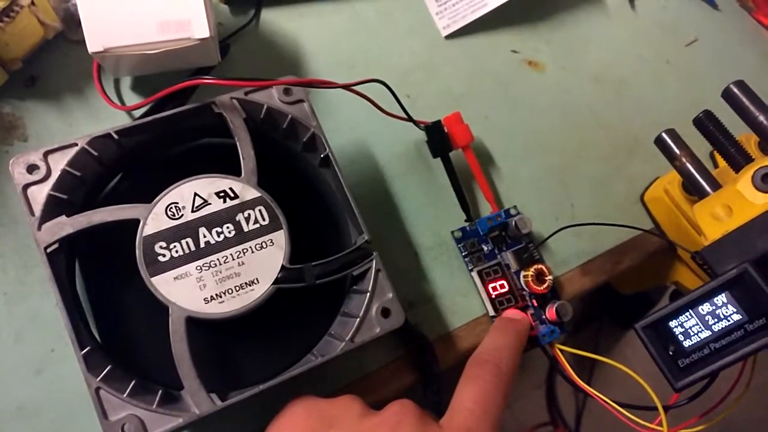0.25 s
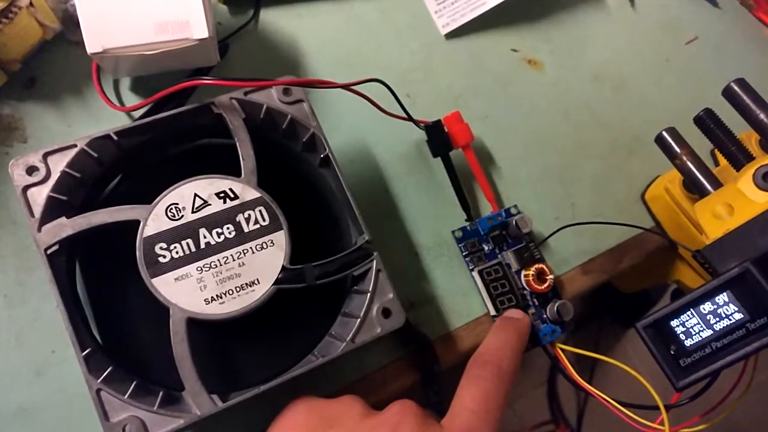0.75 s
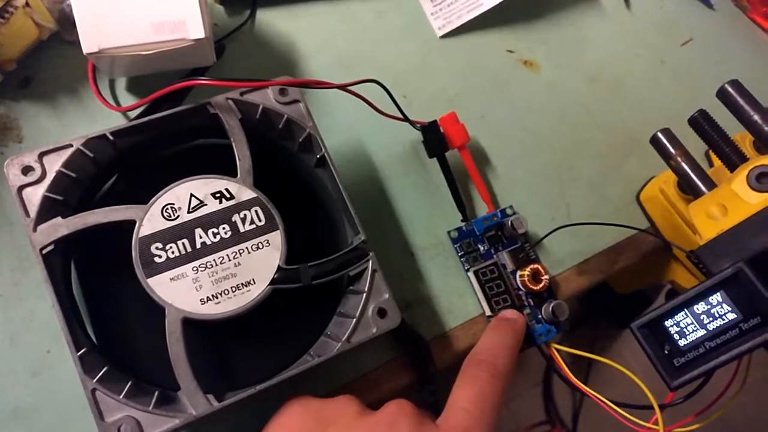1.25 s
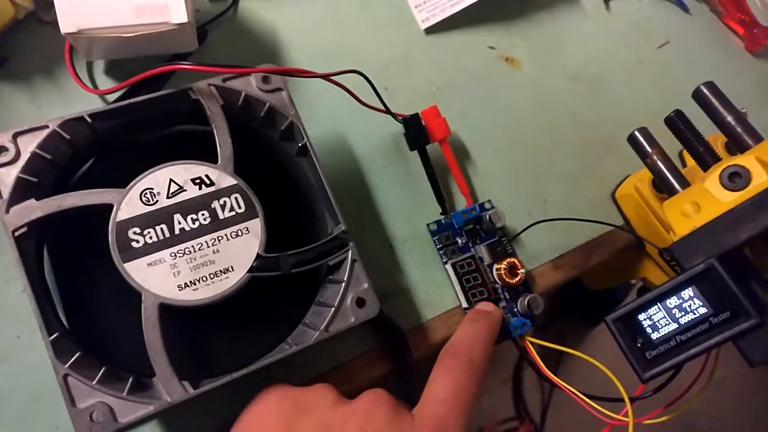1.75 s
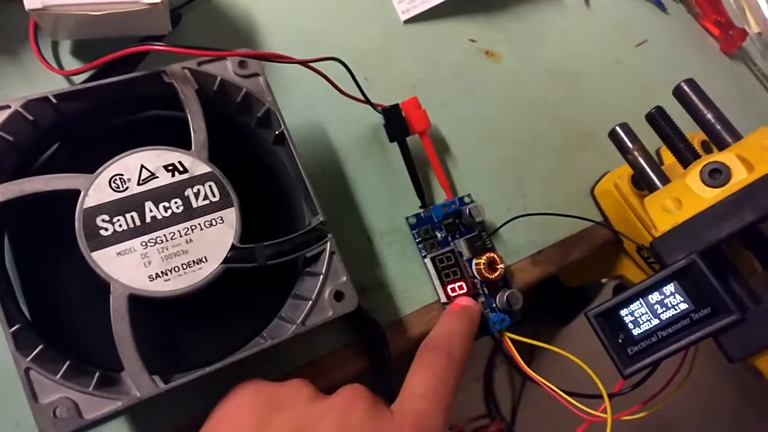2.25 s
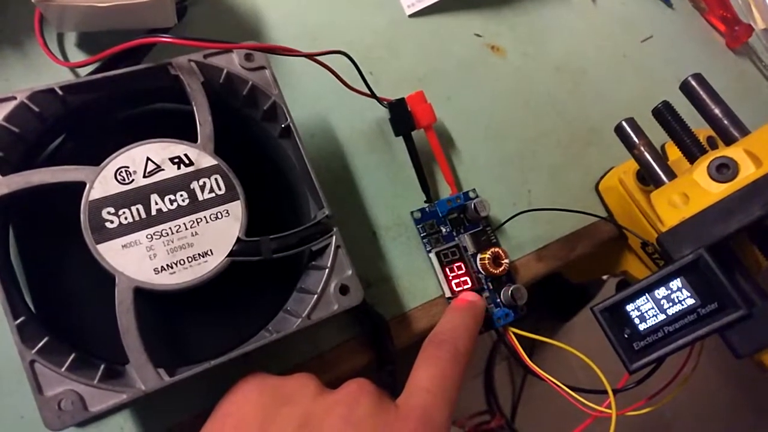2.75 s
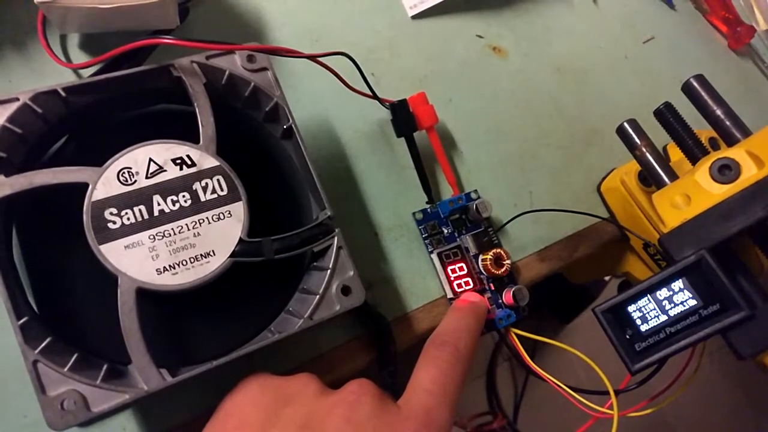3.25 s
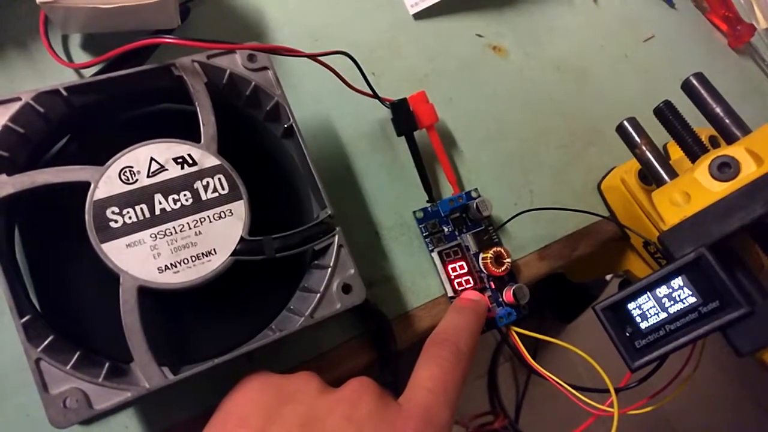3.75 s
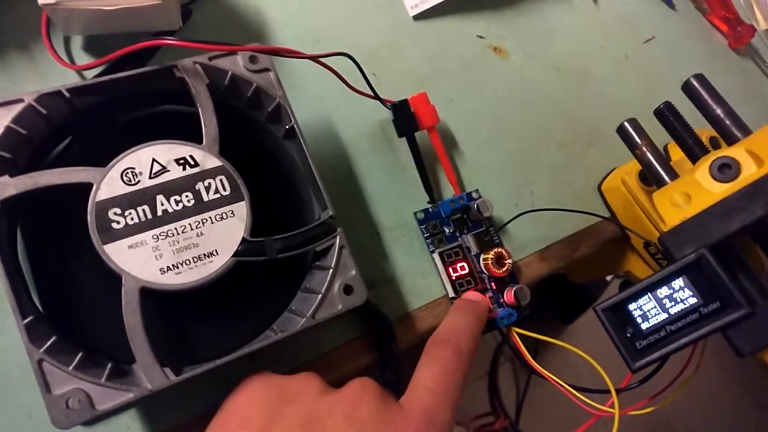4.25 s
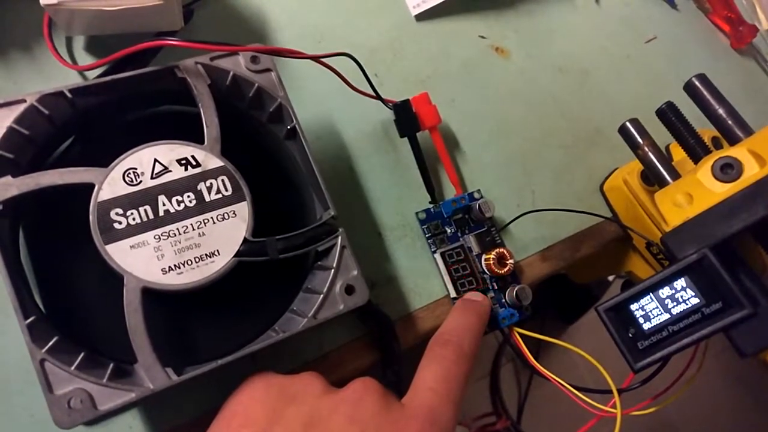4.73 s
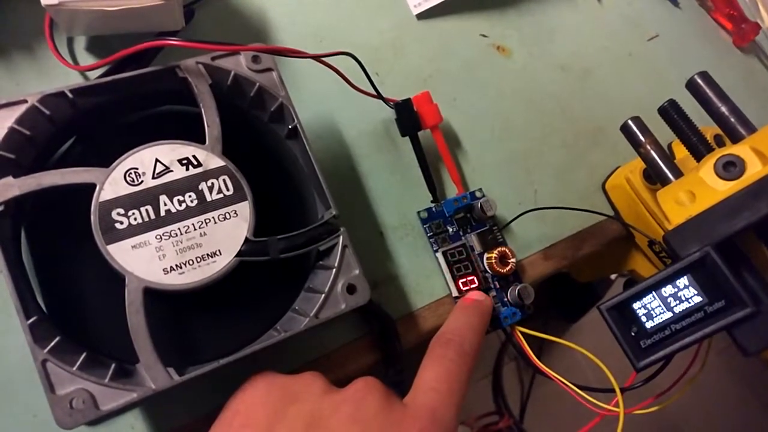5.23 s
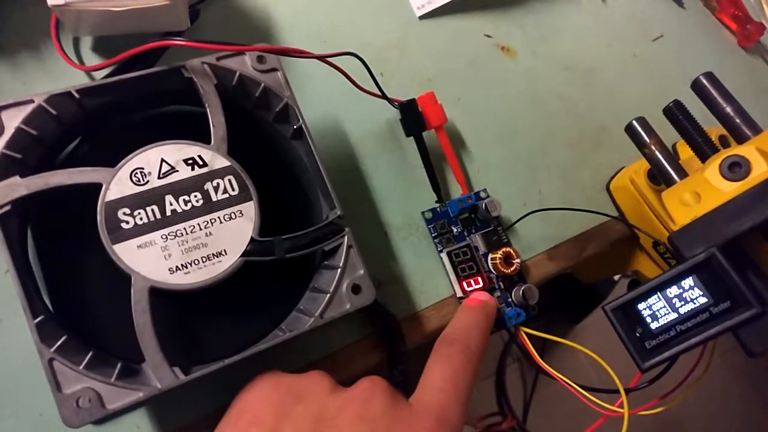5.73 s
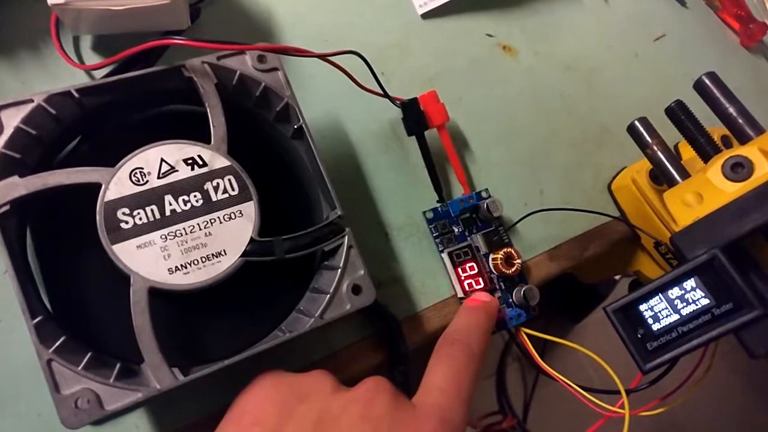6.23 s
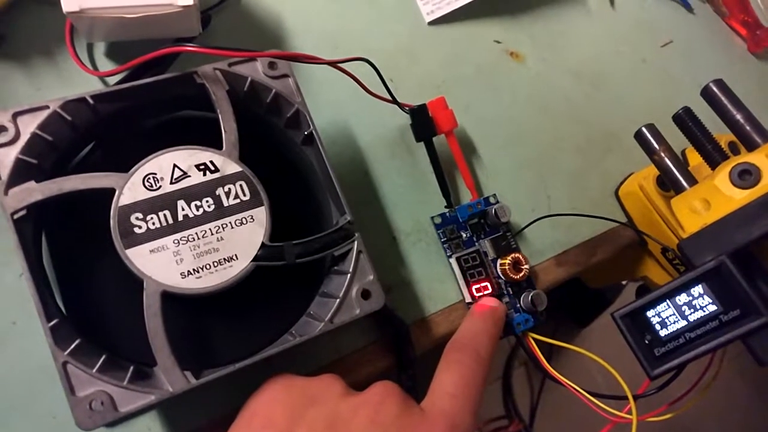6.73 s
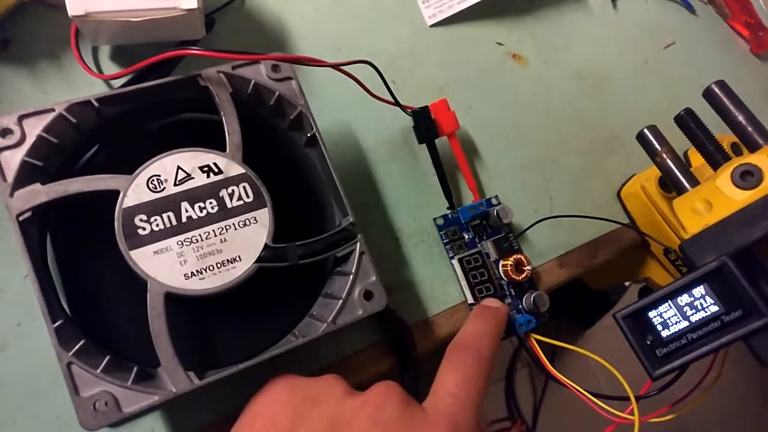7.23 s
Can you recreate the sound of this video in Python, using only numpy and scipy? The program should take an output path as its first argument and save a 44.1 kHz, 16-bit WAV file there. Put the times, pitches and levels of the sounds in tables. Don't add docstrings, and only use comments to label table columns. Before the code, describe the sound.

From 0 s a small, fast axial fan is already at full speed on a bench, about a forearm's length from a handheld stereo microphone. A steady, reedy whine sits near 718 Hz with strong second, third and fourth harmonics up to about 2.9 kHz and only faint higher ones. Around it is a wide rush of turbulent air, thickest around 1 to 5 kHz, with weak bass and a grainy, fluttering hiss. The right is brighter and fuller; the left hears little of the fundamental and has duller treble. The level dips very slightly near 1.25 s, rises a touch around 2.7 s, is marginally strongest near 5.6 s, then eases back. Pitch wavers by a hair, sinking faintly to about 715 Hz after 6.8 s. No starts, stops or clicks; it runs on until the end around 7.5 s.

```python
import sys
import numpy as np
from scipy import signal
from scipy.fft import rfft, irfft, next_fast_len
from scipy.io import wavfile
from scipy.ndimage import uniform_filter1d

SR = 44100
rng = np.random.default_rng(int(sys.argv[2]) if len(sys.argv) > 2 else 0)


def nominal_scale(level):
    x = np.asarray(level, float) / 20
    return 10 ** x


def waveform_to_disk(signal):
    frames = np.transpose(np.atleast_2d(signal))
    scaled = np.clip(frames, -1, 1) * 32767
    samples = np.round(scaled).astype(np.int16)
    wavfile.write(sys.argv[1], SR, samples)


N = 329868

# time in seconds, blade passing rate in Hz, lean of the phone toward the fan in dB.
FAN_SPEED_AND_LEAN = [(0.0, 718.0, -0.3), (1.25, 717.8, -0.7), (2.0, 719.1, -0.3), (2.7, 718.2, 0.3),
                      (4.1, 718.8, 0.0), (4.9, 718.3, 0.1), (5.6, 719.3, 0.5), (6.4, 718.8, 0.0),
                      (6.8, 717.6, -0.3), (7.15, 715.0, -0.4), (7.48, 715.0, -0.4)]
# multiple of the passing rate, left level in dB, right level in dB, left's lead in radians.
BLADE_TONES = [
    (1, -50.5, -31.1, 1.1),
    (2, -37., -33.1, -1.75),
    (3, -35.2, -33.4, .94),
    (4, -34.2, -32.5, -.49),
    (5, -51., -45., 2.95),
    (7, -58., -56., -3.),
    (8, -56., -55.5, 3.),
]
# frequency in Hz, density in dB per Hz.
RUSH_SPECTRUM_LEFT = [(22.0, -85), (62.0, -65.5), (130.0, -64.5), (552.0, -66), (2542.0, -51.5),
                      (2706.0, -55.5), (5073.0, -59.5), (7283.0, -67.5), (8778.0, -80.5), (9494.0, -81.5),
                      (11246.0, -80.2), (15650.0, -69)]
RUSH_SPECTRUM_RIGHT = [(22.0, -82), (76.0, -63.6), (166.0, -61), (413.0, -66), (449.0, -62), (811.0, -59),
                       (1285.0, -51.5), (1827.0, -50), (4724.0, -57), (6968.0, -66), (10283.0, -58),
                       (15650.0, -60)]
# centre in Hz, width in Hz, height in dB.
RESONANCES_LEFT = [(258, 69, 3.7), (396, 110, -4), (498, 55, 4), (654, 32, -0.5), (820, 147, 0.7),
                   (1050, 100, 2.5), (1276, 41, 8), (1430, 200, -4), (2080, 386, 1.9), (2400, 198, -2),
                   (4100, 128, 3.5), (5392, 335, 0), (5720, 274, 2.5), (6866, 522, -3), (7420, 363, 0),
                   (8367, 288, 2.0), (8712, 313, -2.9), (8986, 109, 2.7)]
RESONANCES_RIGHT = [(560, 55, -6.5), (731, 59, 4.8), (810, 46, -7), (1736, 187, -1.1), (2200, 218, 2.0),
                    (2690, 240, -1.5), (3350, 400, 3), (3560, 142, 1), (3820, 300, -2.1), (4440, 120, -5.5),
                    (4700, 260, 2.5), (5409, 326, -4.2), (5727, 163, 3), (6330, 165, 2), (6770, 296, -3.5),
                    (7330, 408, 2.4), (8547, 260, -1), (9093, 640, 2.2)]
# frequency in Hz, share common to both ports from 0 to 1.
COHERENCE = [(30.0, 0.68), (380.0, 0.8), (670.0, 0.34), (1150.0, 0.79), (1500.0, 0.46), (7603.0, 0.14),
             (14230.0, 0.08), (14400.0, 0.7)]
# frequency in Hz, lag of the left port in radians.
LEFT_LAG = [(410.0, 0.15), (560.0, 1.38), (820.0, 1.2), (1200.0, 2.94), (1900.0, 3.3), (2531.0, 4.95),
            (3202.0, 9.33), (4250.0, 12.5)]
# centre in Hz, width in Hz, share.
ECHO_COHERENCE = [(2740, 130, 0.21), (3280, 184, 0.058), (4130, 194, 0.55), (4325, 180, -0.81),
                  (3740, 150, -0.25), (4590, 62, 0.42), (4723, 53, 0.2), (4811, 69, -0.88),
                  (5005, 130, -0.5), (5540, 71, -0.63), (5630, 240, -0.33), (1890, 53, -0.34),
                  (6168, 1200, 0.027), (6400, 78, 0.42), (6721, 170, -0.45), (7230, 240, -0.39)]
# frequency in Hz, then depth in dB in
DROPOUT_DEPTH = [(1500, 1.5, 1., 1.), (3000, 6., 1.5, 1.), (4500, 14., 4., 3.), (7000, 22., 9., 9.),
                 (7800, 0., 20., 18.), (8600, 0., 32., 16.), (9300, 0., 30., 7.), (15500, 0., 22., 9.)]


def whine(passing_hz):
    blade_phase = 2 * np.pi * np.cumsum(passing_hz) / SR
    tones = 0
    for order, left_db, right_db, lead in BLADE_TONES:
        jitter = 0.06 * order * random_walk(22.0)
        phase = round(order) * blade_phase + jitter + rng.uniform(0, 2 * np.pi)
        slow_sway_db = 0.6 * random_walk(5.0)
        flutter_db = 1.1 * random_walk(30.0)
        size = nominal_scale(slow_sway_db + flutter_db)
        size = size / np.sqrt(np.mean(size ** 2) / 2)
        drift = 0.14 * random_walk(3.26)
        left = nominal_scale(left_db) * np.sin(phase + lead + drift)
        right = nominal_scale(right_db) * np.sin(phase)
        tones = tones + size * np.array([left, right])
    return tones


def random_walk(rate):
    hold = int(SR / rate)
    path = np.repeat(rng.standard_normal(N // hold + 1), hold)
    path = uniform_filter1d(uniform_filter1d(path, hold), hold)[:N]
    return path / path.std()


def rush():
    size = next_fast_len(N)
    hz = np.maximum(np.arange(size // 2 + 1) * SR / size, 1.0)
    common, left, right = rfft(rng.standard_normal((3, size)))
    direct = on_log(COHERENCE, hz) * np.exp(-1j * on_log(LEFT_LAG, hz))
    link = 1.07 * (direct + resonances(ECHO_COHERENCE, hz))
    share = np.clip(abs(link), 0, 1)
    late = common * np.exp(1j * np.angle(link))
    shared_part = np.sqrt(share) * np.array([late, common])
    own_part = np.sqrt(1 - share) * np.array([left, right])
    left_gain = port_gain(RUSH_SPECTRUM_LEFT, RESONANCES_LEFT, hz)
    right_gain = port_gain(RUSH_SPECTRUM_RIGHT, RESONANCES_RIGHT, hz)
    ports = (shared_part + own_part) * [left_gain, right_gain]
    return patchy_dropouts(irfft(ports, size)[:, :N]) * nominal_scale(0.27)


def port_gain(spectrum, peaks, hz):
    level_db = on_log(spectrum, hz) + resonances(peaks, hz)
    return nominal_scale(level_db) * np.sqrt(SR / 2)


def resonances(table, hz):
    return sum(height / (1 + (2 * (hz - centre) / width) ** 2) for centre, width, height in table)


def on_log(table, hz, column=1):
    rows = np.array(table, float)
    return np.interp(np.log(hz), np.log(rows[:, 0]), rows[:, column])


def patchy_dropouts(ports):
    patch_hz, patch_s = 130, 0.048
    hz, s, cells = signal.stft(ports, SR, nperseg=1024)
    field = rng.standard_normal((4,) + cells.shape[1:])
    for axis, size in ((1, int(patch_hz / hz[1])), (2, int(patch_s / s[1]))):
        field = uniform_filter1d(uniform_filter1d(field, size, axis), size, axis)
    dips = np.maximum(field / field.std() - 0.4, 0)
    depth_db = np.array([on_log(DROPOUT_DEPTH, hz + 1, column) for column in (1, 1, 2, 3)])
    gain = nominal_scale(-depth_db[:, :, None] * dips)
    gain = gain / np.sqrt(np.mean(gain ** 2, axis=2, keepdims=True))
    mid, side = gain[:2] * [cells[0] + cells[1], cells[0] - cells[1]]
    cells = gain[2:] * [mid + side, mid - side] / 2
    return signal.istft(cells, SR, nperseg=1024)[1][:, :N]


def scene():
    s, *columns = np.transpose(FAN_SPEED_AND_LEAN)
    passing_hz, lean_db = (np.interp(np.arange(N) / SR, s, column) for column in columns)
    lean_left, lean_right, lean_whine = 1.0, 0.3, 2
    rush_db = 0.16 + np.array([[lean_left], [lean_right]]) * lean_db
    whine_db = 0.26 + lean_whine * lean_db
    return rush() * nominal_scale(rush_db) + whine(passing_hz) * nominal_scale(whine_db)


def top_cut(x):
    return signal.sosfilt(signal.butter(12, 15730, fs=SR, output="sos"), x)


def record(dry):
    return top_cut(dry)


dry = scene()
out = record(dry)
waveform_to_disk(out)
```